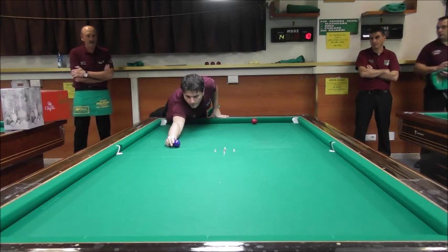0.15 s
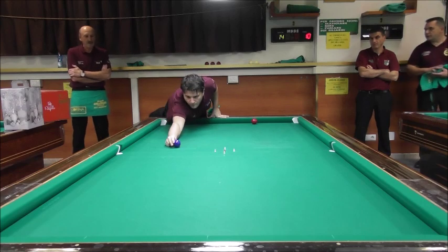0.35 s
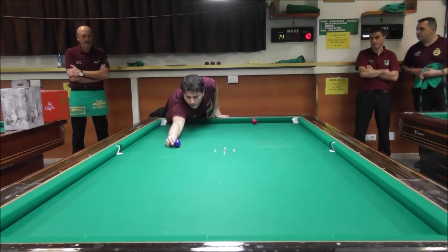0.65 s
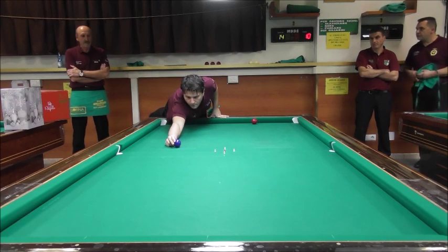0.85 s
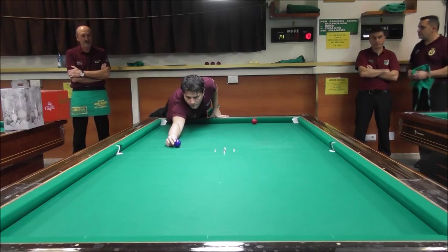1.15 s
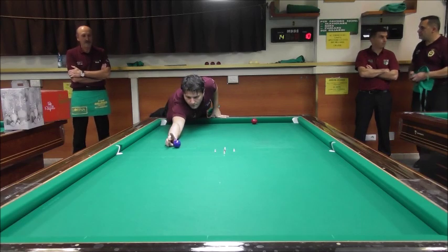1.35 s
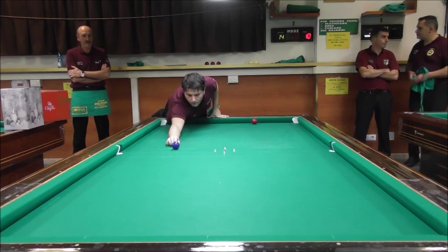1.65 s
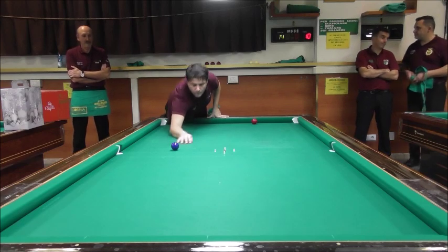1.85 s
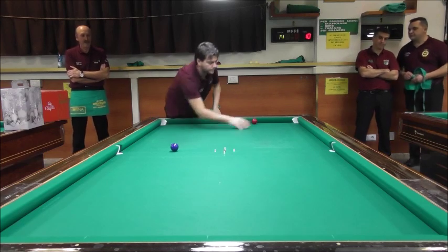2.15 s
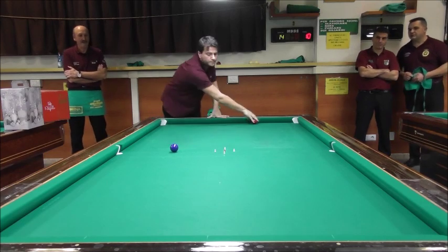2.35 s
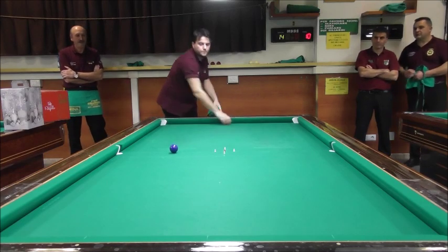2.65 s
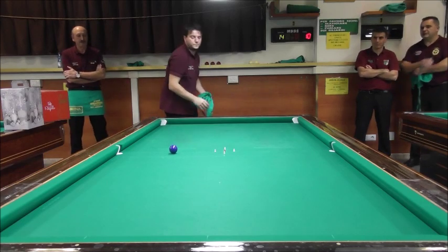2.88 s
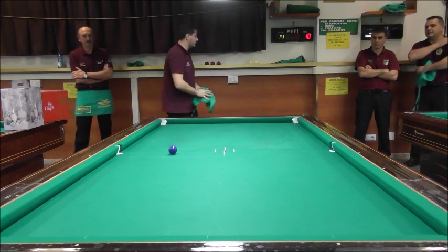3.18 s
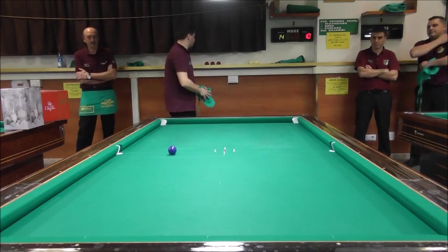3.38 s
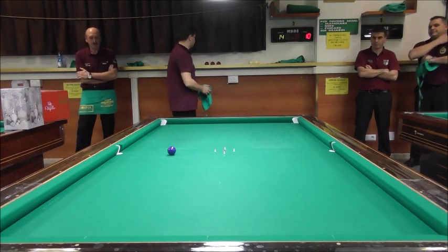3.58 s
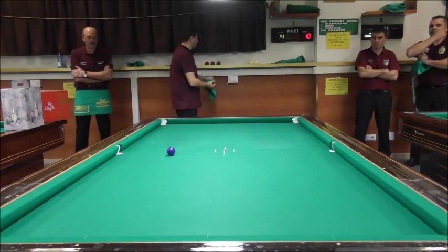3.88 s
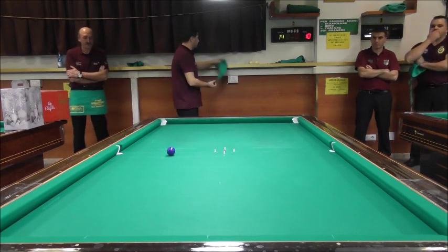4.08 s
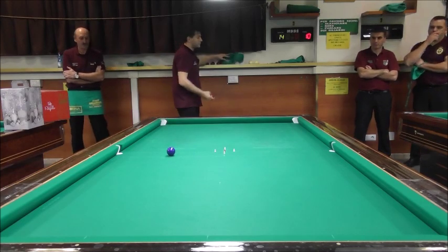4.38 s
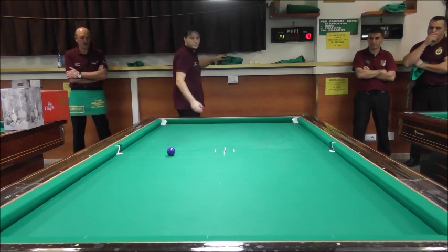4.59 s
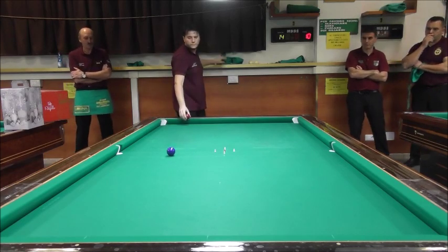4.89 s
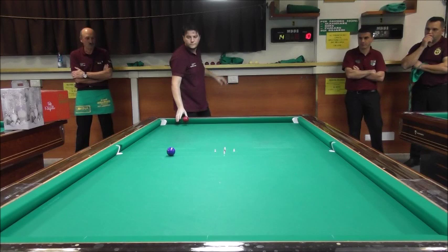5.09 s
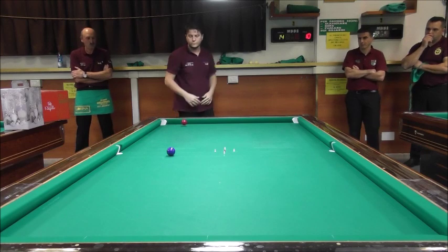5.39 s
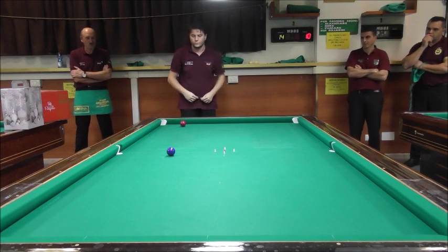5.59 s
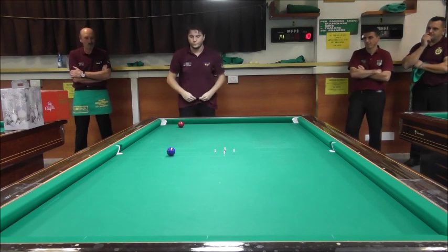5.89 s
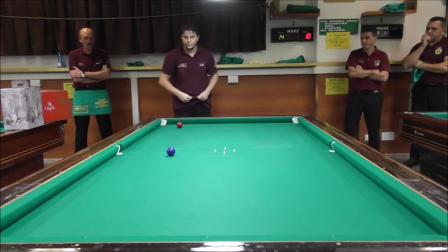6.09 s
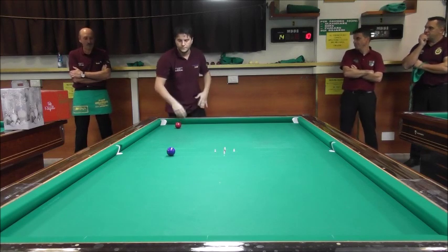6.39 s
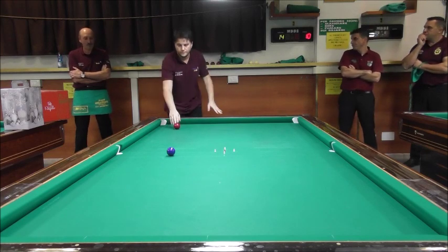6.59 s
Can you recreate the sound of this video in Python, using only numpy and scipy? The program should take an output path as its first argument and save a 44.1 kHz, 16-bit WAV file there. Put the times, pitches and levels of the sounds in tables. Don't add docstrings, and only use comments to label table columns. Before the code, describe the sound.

Distant stereo pickup in a reverberant billiard hall, the low fan hum always present. First faint rustles, then two soft knocks on the slate table as a ball is set down. A bright brushing sweep over cloth stops abruptly, followed by small rustles, fine ticks and a low sole creak. Then a ball bounces about ten times, closer and closer, ringing the table and room before settling.

```python
import sys
import numpy as np
from scipy import signal
from scipy.fft import rfft, irfft, next_fast_len
from scipy.io import wavfile
from scipy.ndimage import uniform_filter1d

SR = 44100
rng = np.random.default_rng(int(sys.argv[2]) if len(sys.argv) > 2 else 0)


def put_to_file(sound):
    columns = np.atleast_2d(sound).T
    safe = np.clip(columns, -1, 1)
    whole_steps = np.round(safe * 32767)
    wavfile.write(sys.argv[1], SR, whole_steps.astype(np.int16))


def convert_level_to_amplitude(level_db):
    exponent = np.asarray(level_db, float) / 20
    return 10 ** exponent


N = 297234

# pitch_hz, density_db (per Hz)
RUMBLE = [(11, -36), (18, -31), (43, -2.5), (75, -9.5), (119, -1), (196, -11), (278, -11.5), (311, -13.5),
          (418, -20.5), (522, -18), (573, -25), (770, -27.5), (1060, -40.5), (1270, -61), (1500, -52),
          (1950, -73), (3300, -120)]
HISS = [(710, -18), (1200, 0), (1320, -12), (1520, -3), (1750, -1), (2620, -7), (4160, -7.5), (5270, -13.5),
        (5920, -5), (7340, -1), (11000, -5), (14700, -3), (15500, -3.5)]
# pitch_hz, width_hz, level_db
DUCTS = [(48.3, 13, -47), (114, 26, -29), (128.15, 7, -42), (309.2, 17.5, -41), (10020, 150, -69.5)]
# pitch_hz, likeness (0 to 1)
AIR_LIKENESS = [(60, 1), (100, 0.98), (180, 0.97), (310, 0.88), (550, 0.94), (950, 0.86), (1650, 0.97),
                (2860, 0.95), (4970, 1), (8640, 0.9), (15000, 0.043)]
BLOW_LIKENESS = [(60, 0.64), (180, 0.84), (550, 0.84), (1650, 0.73), (4970, 0.98), (15000, 0.43)]
# pitch_hz, left_over_right_db
AIR_LEAN = [(60, -1.5), (150, 0), (380, 3.5), (950, 2.5), (2380, 1), (5980, -1), (15000, 1)]
BLOW_LEAN = [(60, -10), (150, -1), (380, 3.5), (1100, 7), (2380, 0), (5980, 3), (15000, -10)]

# pitch_hz, density_db (per Hz)
SWISH = [(2650, -32), (4500, -20), (5280, -20), (7210, -3.5), (7640, -1), (11500, -11.5), (14500, -14),
         (15500, -12)]
RUB = [(1100, -24), (1500, 3), (2000, 2.5), (2800, 4), (3500, -4), (4100, -2), (5000, -8)]
# start_s, length_s, level_db
SHIRTS = [(.191, .5, -63), (.755, .11, -56), (.94, .2, -68), (2.22, 0.58, -52), (2.72, 0.72, -56),
          (3.301, .29, -58), (3.62, .14, -52.5), (3.89, 0.35, -60), (4.2, .11, -59), (4.239, 0.104, -51),
          (4.33, .1, -57), (4.498, .06, -51), (4.78, .18, -60), (6.15, .28, -61)]
# start_s, length_s, level_db
SEAMS = [
    (.25, .42, -58),
    (6.003, .16, -62),
    (6.22, .14, -60),
]
# start_s, length_s, level_db
TOWELS = [
    (2.33, 0.27, -55.5),
    (4.247, 0.065, -54),
    (4.37, .06, -57.5),
]
# start_s, length_s, level_db
APRONS = [
    (2.3, 0.49, -59.5),
    (2.7, 0.27, -63.5),
]
# start_s, length_s, level_db, pitch_hz
SOLES = [
    (0.269, 0.21, -62, 1800),
    (3.578, 0.14, -60, 1590),
    (4.497, 0.15, -47.5, 970),
]

# start_s, thud_db, clack_db (re thud), tick_db (re thud), tilt_db (per octave)
CONTACTS = [
    (.903, -25.5, -19.5, -21, -9),
    (.946, -30, -36, -55, -20.5),
    (1.3024, -16, -33, -54, -7.5),
]
# start_s, thud_db
BOUNCES = [
    (5.0820, -10),
    (5.2535, -7),
    (5.3875, -6),
    (5.4900, -8.5),
    (5.5673, -11),
    (5.6253, -13),
    (5.6690, -17.5),
    (5.7020, -23),
    (5.7270, -28),
    (5.7455, -35),
]
# start_s, level_db, pitch_hz, width_hz
TICKS = [(.892, -30, 614, 346), (.915, -24.5, 510, 298), (1.3035, -17.5, 516, 300),
         (0.904, -50.5, 4080, 2500), (1.211, -44, 9550, 3850), (1.212, -62, 4500, 1990),
         (2.652, -43.5, 9300, 7000), (2.686, -48, 11000, 5830), (3.979, -48, 8300, 2500),
         (4.194, -48.5, 7340, 3000), (4.194, -54, 3000, 3000), (4.255, -52, 8060, 4000),
         (4.293, -52, 8000, 4000), (4.512, -55.5, 1900, 800), (4.512, -55, 8500, 3000),
         (4.537, -52, 7300, 2000)]
# pitch_hz, density_db (per Hz)
THUD = [(35, -43), (70, -17), (130, -5), (170, -9.5), (270, 0.5), (340, -3), (480, -2), (600, -1.5),
        (720, -10), (850, -2.5), (1000, -12), (1150, -17.5), (1280, -27), (1600, -31.5)]
CLACK = [(900, -30), (1300, -8), (1650, 8.5), (1870, 5.5), (2100, 6.5), (2350, 3), (2600, -0.5), (2850, 0),
         (3100, -6), (3500, -9), (3950, -12), (4300, -20), (5200, -24), (6500, -50)]
TOUCH = [(2940, -6.5), (5000, -22.5), (5390, -17), (7000, -2.5), (8670, -6), (9400, -9.5), (10800, -12),
         (15500, -21)]
# pitch_hz, level_db, t60_s
SLATE_RINGS = [(225, -2, 0.63), (330, 8, 0.44), (417, -19, 0.16), (510, -0.5, 0.18), (560, -6.5, 0.42),
               (672, 4.5, 0.5), (724, -2.5, 0.5), (827, 6, 0.13), (945, -46, 0.098), (1057, 5, 0.16),
               (1110, -15, 0.075), (1123, -38, 0.18), (1510, -9, .2), (496, 8, 0.24)]
BALL_RINGS = [(1610, -13, 0.088), (2166, 7, 0.051), (2550, -1, .09), (2757, 3, 0.099), (2883, 1, 0.078)]
# delay_s, clack_db, tick_db, left_over_right_db
EARLY = [(.0012, 5, -32, 2), (.0045, -15, -12, -3), (.0082, -7, 7, 1), (.0098, -16, 11.5, -2),
         (0.013, -1.5, 5, 3), (0.015, -3, -12, 1), (0.0186, 4, 7, 9), (0.0222, 1, -11, 2),
         (.036, -24, -12, 3), (0.041, -14, -14, 1)]
# pitch_hz, t60_s, build_up_s, lateness_s, hold_s
HALL = [(150, 0.63, 0.023, 0.0032, 0.033), (400, 0.41, 0.0068, 0.0031, 0.041),
        (890, 0.32, 0.0051, 0.0014, 0.023), (1900, 0.36, 0.0012, .0002, 0.004),
        (3500, 0.32, 0.0084, .0002, 0.009), (7500, 0.22, 0.0051, 0.0035, .012),
        (12900, 0.061, 0.0044, .0025, 0.0061)]


def evened(x):
    return x / np.sqrt(np.mean(x ** 2) + 1e-20)


def read(points, hz):
    f, value = np.transpose(points)[:2]
    return np.interp(np.log(hz + 1), np.log(f + 1), value)


def band(points):
    return lambda hz: convert_level_to_amplitude(read(points, hz)) * (hz >= points[0][0]) * (hz <= points[-1][0])


def peak(centre_hz, width_hz):
    return lambda hz: 1 / (1 + (2 * (hz - centre_hz) / width_hz) ** 2)


def drift(seconds):
    size = max(round(seconds * SR), 1)
    once = uniform_filter1d(rng.standard_normal(N), size)
    return evened(uniform_filter1d(once, size))


def add(mix, start_s, sound):
    part = mix[:, round(start_s * SR):][:, :sound.shape[1]]
    part += sound[:, :part.shape[1]]


def microphone_ports(noise, likeness, lean):
    a, b = rfft(noise)
    hz = np.fft.rfftfreq(noise.shape[1], 1 / SR)
    alike = np.clip(read(likeness, hz), 0, 1)
    tilt = convert_level_to_amplitude(read(lean, hz) / 2)
    left = a * tilt
    right = (alike * a + np.sqrt(1 - alike ** 2) * b) / tilt
    return hz, np.array([left, right])


def air(shape, size=N):
    fast = next_fast_len(size)
    hz, z = microphone_ports(rng.standard_normal((2, fast)), AIR_LIKENESS, AIR_LEAN)
    return evened(irfft(z * shape(hz), fast)[:, :size])


def ventilation():
    rumble = convert_level_to_amplitude(-24.5 + 0.45 * drift(0.076)) * air(band(RUMBLE))
    ducts = sum(convert_level_to_amplitude(db) * air(peak(hz, width)) for hz, width, db in DUCTS)
    hiss = convert_level_to_amplitude(-53.5) * air(band(HISS))
    return rumble + ducts + hiss


def reflections(size):
    return rng.standard_normal((2, size)) * (rng.random((2, size)) < .12)


def hall(taps, colour, build_share, smear_s):
    size = taps.shape[1]
    t = np.arange(size) / SR
    hz, z = microphone_ports(evened(taps), BLOW_LIKENESS, BLOW_LEAN)
    z = z * colour(hz)
    sound = np.zeros((2, size))
    far = convert_level_to_amplitude(-26.0 - 60 * t / 0.2)
    for k, (_, t60, build, late, hold) in enumerate(HALL):
        share = read([(row[0], float(j == k)) for j, row in enumerate(HALL)], hz)
        since = np.maximum(t - build_share * late, 0)
        rise = 1 - np.exp(-since / (build_share * build + smear_s))
        decay = convert_level_to_amplitude(-60 * np.maximum(t - build_share * hold, 0) / t60)
        sound += irfft(z * share, size) * rise * (decay + far)
    return sound


def stroke(full_s, ease_s, level_db, rise_db_per_s, fall_db_per_s):
    t = np.arange(N) / SR
    swell = rise_db_per_s * np.maximum(full_s - t, 0)
    ease = fall_db_per_s * np.maximum(t - ease_s, 0)
    lift = 300 * np.maximum(t - 2.25, 0)
    return convert_level_to_amplitude(level_db - swell - ease - lift)


def cloth():
    mix = air(band(SWISH)) * stroke(2.06, 2.14, -40, rise_db_per_s=45, fall_db_per_s=66)
    mix += air(band(RUB)) * stroke(1.84, 1.98, -57, rise_db_per_s=55, fall_db_per_s=40)
    fabrics = [(SHIRTS, (8030, 3700)), (SEAMS, (7500, 500)), (TOWELS, (3200, 2100)), (APRONS, (1960, 1700))]
    rustles = [row + kind for rows, kind in fabrics for row in rows]
    rustles += [row + (200,) for row in SOLES]
    for start, length, db, hz, width in rustles:
        size = round(length * SR)
        swell = np.sin(np.pi * np.arange(size) / size)
        add(mix, start, convert_level_to_amplitude(db) * swell * air(peak(hz, width), size))
    return mix * convert_level_to_amplitude(0.41 * drift(0.0022) + 0.19 * drift(0.035))


def knocks_and_ticks():
    mix = np.zeros((2, N))
    snap_db = 13.5
    fade_in = np.sin(np.pi / 2 * np.minimum(np.arange(400) / 66, 1)) ** 2
    for start, db, hz, width in TICKS:
        colour = lambda f: evened(peak(hz, 1.4 * width)(f) ** 2)
        pulse = irfft(colour(np.fft.rfftfreq(12000, 1 / SR)))
        click = np.roll(pulse, 66)[:400] * fade_in
        add(mix, start, convert_level_to_amplitude(db + snap_db) * np.sqrt(8000 / hz) * np.array([click, click]))
        add(mix, start, convert_level_to_amplitude(db - 1.5) * hall(reflections(12000), colour, 0.04, 0.00018))
    return mix


def ringing(modes, t, weight):
    return sum(weight(f) * convert_level_to_amplitude(db - 60 * t / t60) * np.sin(2 * np.pi * f * t) for f, db, t60 in modes)


def blow(thud_db, clack_db, tick_db, smear_s, tilt_db, shared, alike,
         ring_db, early_db, slate_hz, build_share, ball_db):
    size = shared.shape[1]
    t, hz = np.arange(size) / SR, np.fft.rfftfreq(size, 1 / SR)

    def dull(f):
        return convert_level_to_amplitude(tilt_db * np.log2(np.clip(f, 230, 1500) / 400)) * np.minimum(f / slate_hz, 1) ** 3

    clack = convert_level_to_amplitude(clack_db) * evened(band(CLACK)(hz))
    clack *= convert_level_to_amplitude(16.0 * min(tilt_db, 0) * np.log2(np.maximum(hz / 2950, 1)))
    tick = convert_level_to_amplitude(tick_db) * evened(band(TOUCH)(hz))
    taps = alike * shared + np.sqrt(1 - alike ** 2) * reflections(size)
    sound = hall(taps, lambda f: dull(f) * evened(band(THUD)(f)) + clack + tick, build_share, smear_s)

    slate = ringing(SLATE_RINGS, t, dull) * (1 - np.exp(-t / (0.0021 + smear_s)))
    sound += convert_level_to_amplitude(ring_db + np.array([[1.5], [-1.5]])) * slate
    ball = ringing(BALL_RINGS, t, lambda f: 1) * (1 - np.exp(-t / 0.0024))
    sound += convert_level_to_amplitude(clack_db + ball_db) * ball

    echoes = 0
    for delay, mid_db, top_db, lean in EARLY:
        sides = convert_level_to_amplitude(np.array([[lean], [-lean]]) / 2)
        bright = convert_level_to_amplitude(mid_db) * clack + convert_level_to_amplitude(top_db) * tick
        echoes = echoes + sides * bright * np.exp(-2j * np.pi * hz * delay)
    sound += convert_level_to_amplitude(early_db) * irfft(echoes, size) * np.minimum(t / .0005, 1) * (t < .1)
    return convert_level_to_amplitude(thud_db) * sound


def set_down(shared):
    mix = np.zeros((2, N))
    for start, thud_db, clack_db, tick_db, tilt_db in CONTACTS:
        add(mix, start, blow(thud_db, clack_db, tick_db, 0.00018, tilt_db, shared, alike=0.42, ring_db=-10.5,
                             early_db=-6, slate_hz=238, build_share=0.57, ball_db=-16))
    return mix


def bouncing_ball(shared):
    mix = np.zeros((2, N))
    for k, (start, thud_db) in enumerate(BOUNCES):
        speed_db = -2.5 * k
        cushion_db = 4 * min(speed_db + 12, 0)
        clack_db = -13 + speed_db + cushion_db
        tick_db = -26.5 + 1.5 * speed_db
        tilt_db = .5 * min(speed_db + 9.5, 0)
        ball_db = -3.5 - 0.3 * speed_db
        add(mix, start, blow(thud_db, clack_db, tick_db, .0008, tilt_db, shared, alike=.9, ring_db=-13.5,
                             early_db=10.0, slate_hz=60, build_share=0.71, ball_db=ball_db))
    return mix


def scene():
    shared = reflections(32768)
    return ventilation() + cloth() + knocks_and_ticks() + set_down(shared) + bouncing_ball(shared)


def band_limit(x):
    return signal.sosfilt(signal.butter(12, 15780, fs=SR, output="sos"), x)


def record(dry):
    power = uniform_filter1d((dry ** 2).mean(0), size=600, origin=299)
    power_db = 10 * np.log10(abs(power) + 1e-12)
    creep_db = np.arange(N) * 2.7 / SR
    held_db = np.maximum.accumulate(power_db + creep_db) - creep_db
    over_db = np.clip(held_db + 11.0, 0, None)
    lag = np.exp(-1 / (.017 * SR))
    duck_db = 12.17 * np.tanh(signal.lfilter([1 - lag], [1, -lag], over_db) / 7)
    overloaded = 1.128 * np.tanh(dry / convert_level_to_amplitude(duck_db) / 1.083)
    top_edge = signal.firwin(255, 15900, window=("kaiser", 9), fs=SR)[None]
    return band_limit(signal.oaconvolve(overloaded, top_edge, "same"))


dry = scene()
out = record(dry)
put_to_file(out)
```